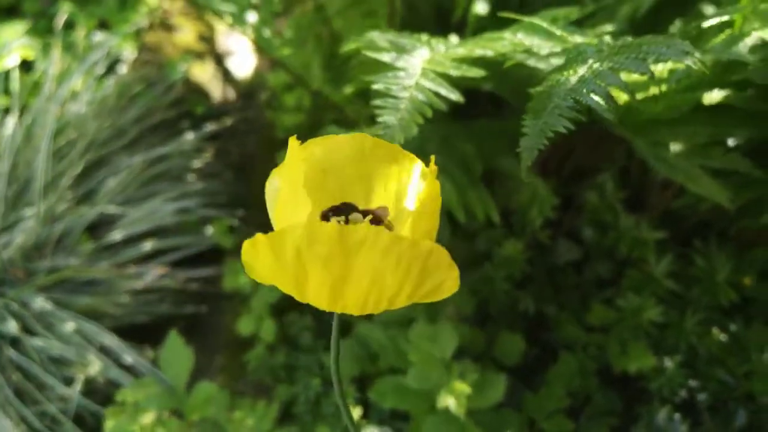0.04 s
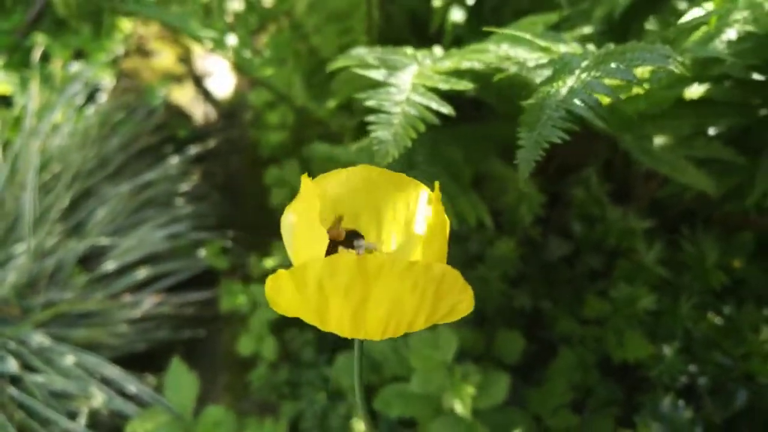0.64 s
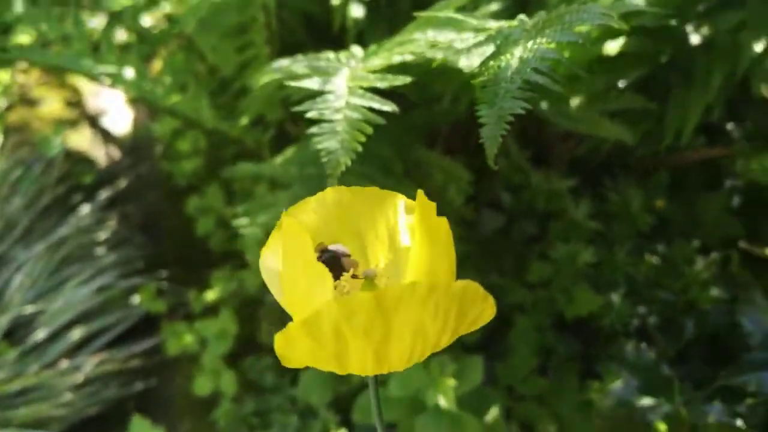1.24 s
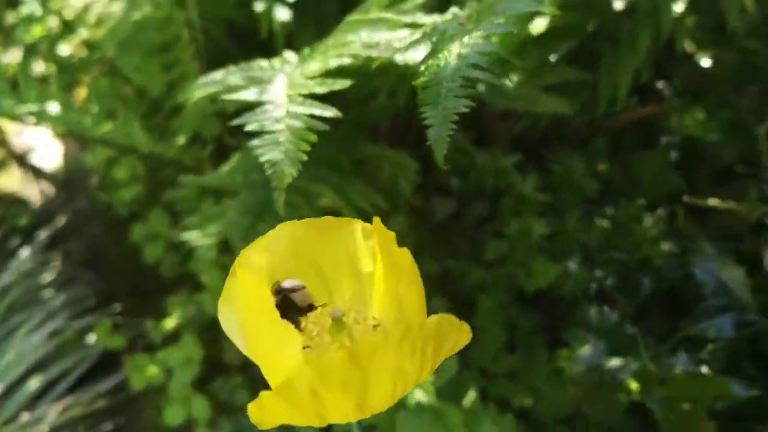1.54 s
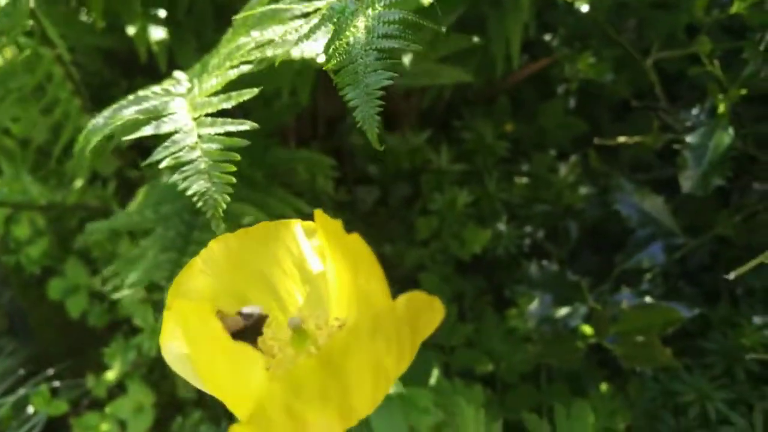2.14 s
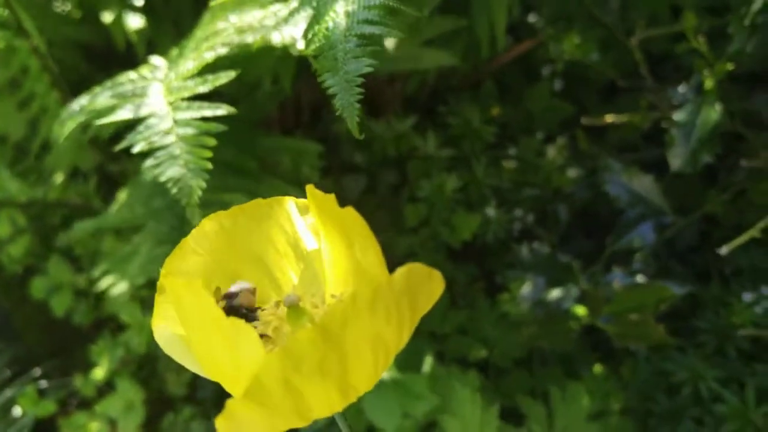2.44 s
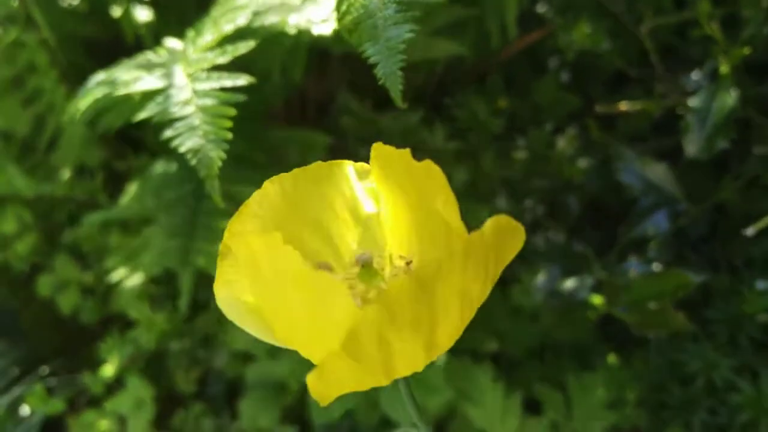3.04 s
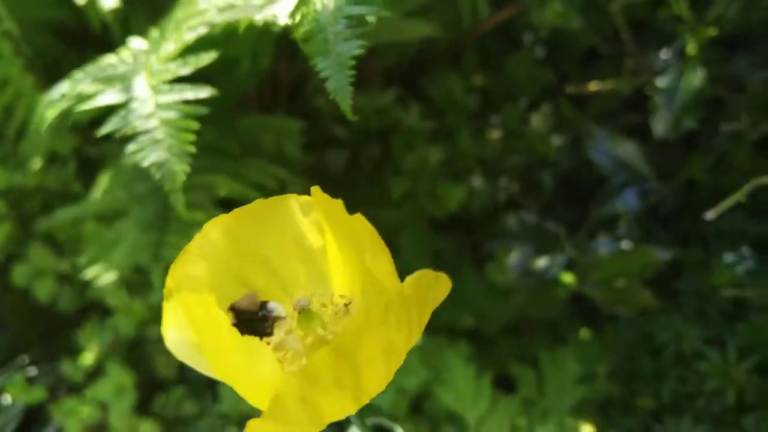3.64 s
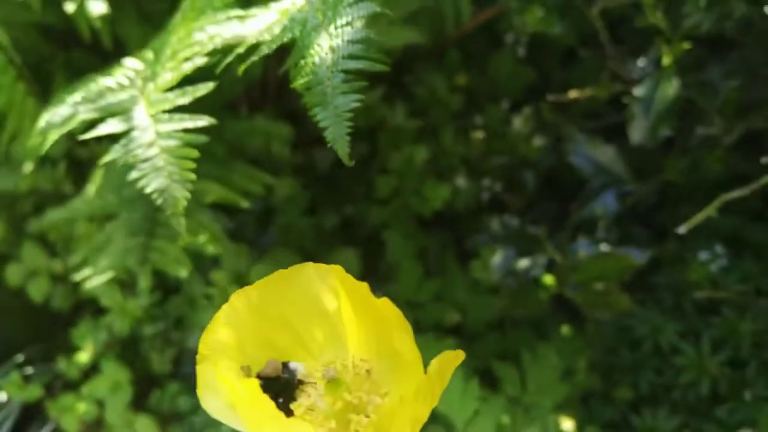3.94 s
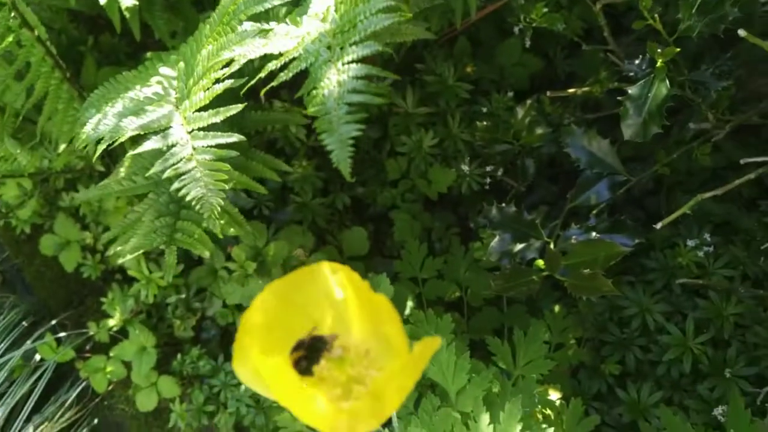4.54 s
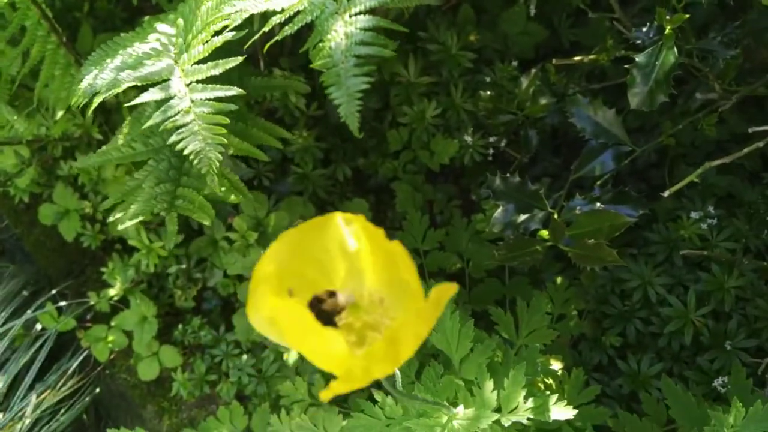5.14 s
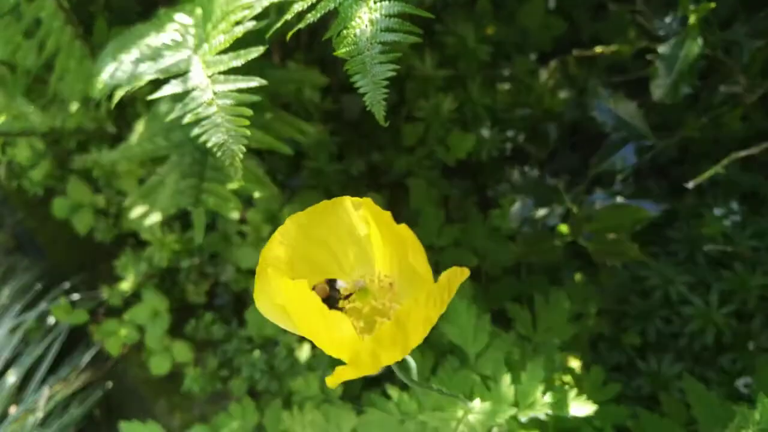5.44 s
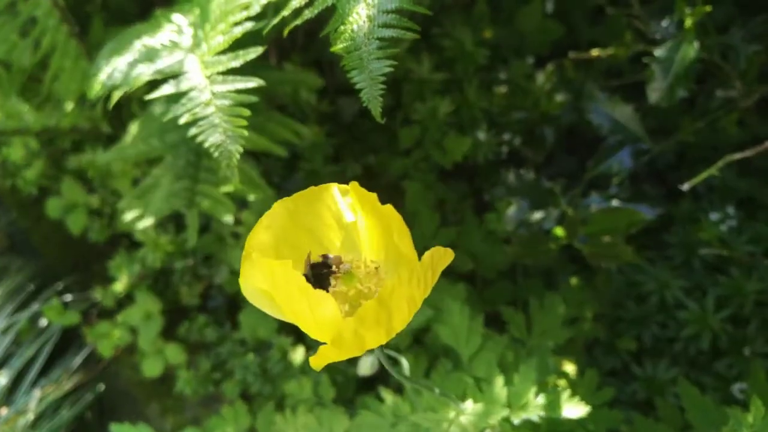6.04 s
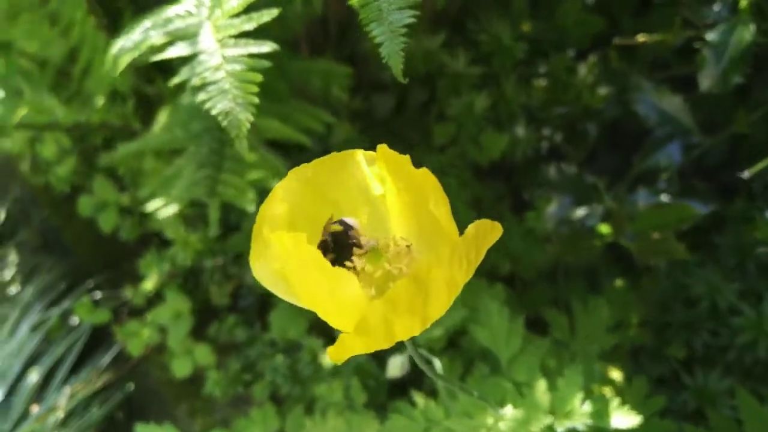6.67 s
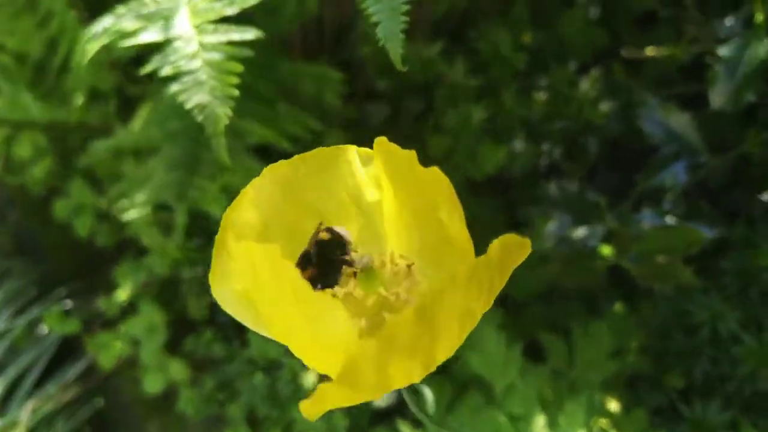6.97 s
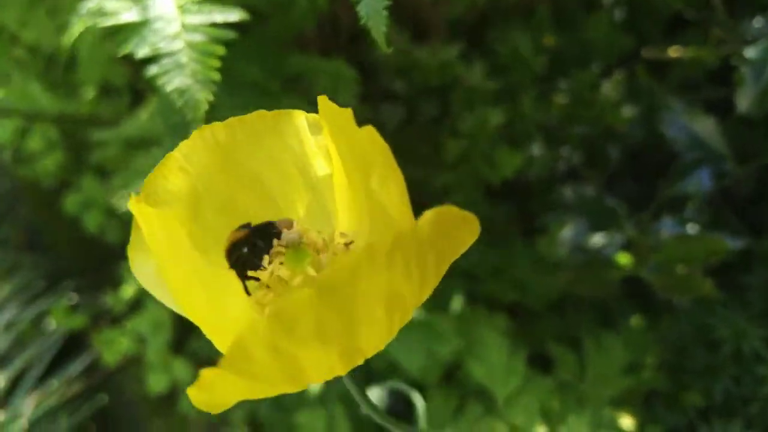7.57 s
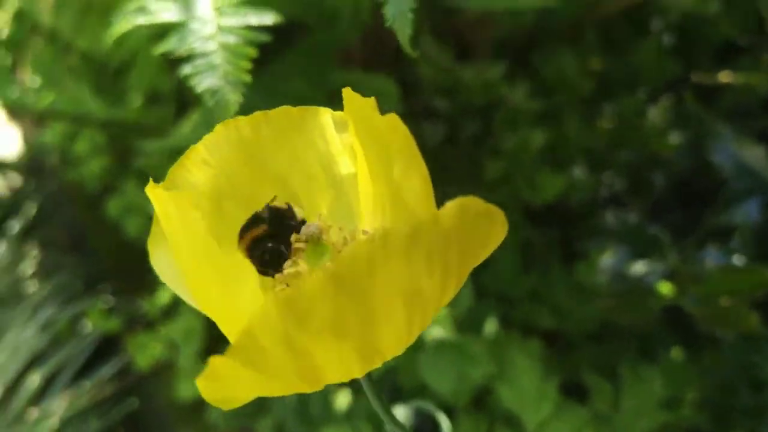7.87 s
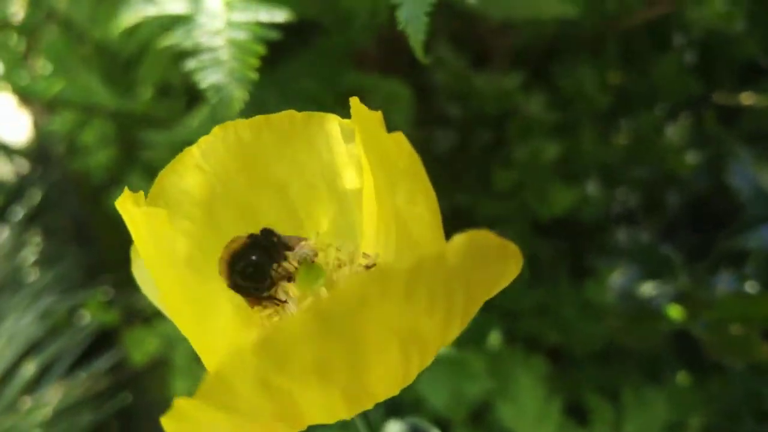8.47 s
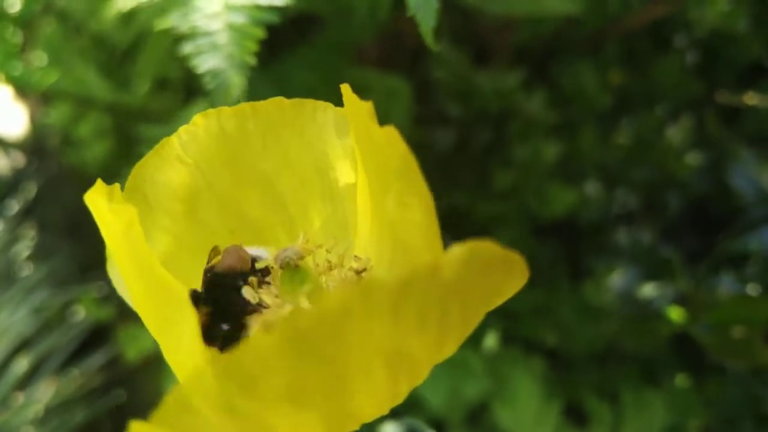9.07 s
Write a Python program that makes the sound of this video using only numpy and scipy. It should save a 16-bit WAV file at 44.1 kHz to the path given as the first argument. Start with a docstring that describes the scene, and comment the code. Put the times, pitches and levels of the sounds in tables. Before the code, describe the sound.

A bumblebee buzzes briefly inside a flower as songbirds twitter, chirp and trill around a quiet garden.

```python
"""A shady garden. A finch whistles a falling trill with a closing flourish, using both sides of its
voice box. A nearer songbird chirps, another twitters in the hedge, and thin high calls, hoarse churrs
and far-off fluting fill the gaps. Leaves and walls scatter every note, over a soft wash of air.
Close by, a bumblebee shakes pollen from a poppy in three short buzzes, its body knocking against the
flower. Its feet scratch on the petals, and now and then something dry snaps among the plants."""
import sys
import numpy as np
from scipy import signal
from scipy.fft import rfft, irfft, next_fast_len
from scipy.io import wavfile

SR = 44100
rng = np.random.default_rng(int(sys.argv[2]) if len(sys.argv) > 2 else 0)


def store_pcm(level_fs):
    """Save levels as 16-bit WAV."""
    pcm = np.round(np.clip(level_fs, -1, 1) * 32767).astype(np.int16)
    wavfile.write(sys.argv[1], SR, np.atleast_2d(pcm).T)


N = 410564
T = np.arange(N) / SR

# tone colour of the outdoor air: (frequency [Hz], relative level [dB])
AIR_COLOUR = [(15, -38), (25, -19), (495, -18), (919, -12.5), (1110, -9), (1530, -4.5), (2170, -2),
              (2490, -3), (3530, -4), (3930, -2.5), (5580, -11), (6920, -17), (7500, -14.5), (8580, -16),
              (15500, -22.5)]
# loudness of the wash of leaves and far birds: (time [s], level [dB])
WASH_LEVELS = [(0, -64), (.8, -65), (1.5, -67.5), (2.2, -71.5), (2.8, -61.5), (3.1, -70), (4, -74),
               (5, -67.5), (6.5, -72), (7.6, -73.5), (8.3, -71), (8.5, -64), (9.0, -72), (9.3, -63)]
# its tone colour: (frequency [Hz], relative level [dB])
WASH_COLOUR = [(300, -48), (900, -18.5), (1600, -6.5), (3000, 3.5), (4500, -3), (6500, -14), (15000, -24)]

# a fluting bird in far trees: (time [s], length [s], from [Hz], to [Hz], level [dB])
FLUTING_SLIDES = [(0, 0.13, 2150, 2492, -54.5), (.18, 0.243, 2204, 2230, -59.5),
                  (.49, 0.05, 1693, 1595, -62), (3.16, .056, 1970, 1933, -61.5),
                  (3.29, 0.17, 1943, 2180, -60.5), (3.80, .15, 2380, 2650, -60.5),
                  (4.78, 0.064, 2080, 2195, -60), (4.94, 0.12, 2240, 2094, -58),
                  (7.83, .037, 2190, 2257, -62), (7.95, .096, 2060, 1965, -65.5),
                  (8.1, .13, 2044, 2090, -61.5), (8.74, .028, 2125, 2040, -61),
                  (8.43, .12, 2450, 2030, -62.5), (8.75, 0.15, 2614, 2680, -59.5)]
# single whistles of other far birds: (time [s], length [s], pitch [Hz], level [dB])
FAR_WHISTLES = [(.21, 0.097, 4670, -64.5), (1.17, .05, 2090, -67), (1.2, 0.081, 4330, -61),
                (1.33, 0.041, 2160, -65.5), (1.93, 0.083, 3860, -64.5), (4.36, 0.089, 4010, -69),
                (4.53, 0.15, 4520, -66)]
# harsh falling calls: (time [s], level [dB])
CHURR_CALLS = [(.425, -52.5), (.56, -53), (.865, -55), (1.08, -59.5), (1.225, -55.5), (1.381, -60),
               (1.69, -59.5), (1.775, -57.5)]
# bursts of scratchy notes: (time [s], length [s], lowest [Hz], highest [Hz], level [dB])
SCRATCHY_BURSTS = [(2.63, 0.32, 3800, 5416, -58), (2.66, .22, 1460, 1619, -70.5),
                   (3.23, .15, 3900, 4910, -60), (9.2, .11, 3010, 4580, -58)]
# a thin call that dips in the middle: (time [s], lowest pitch [Hz], level [dB])
THIN_CALLS = [(-.1, 7370, -69), (.31, 7420, -54), (.84, 7500, -66), (1.43, 7520, -66), (1.889, 7590, -63.5),
              (2.40, 7570, -65), (3.125, 7180, -55.5), (5.555, 7280, -58), (6.66, 7250, -55),
              (7.14, 7550, -70.5)]
# the same voice sliding: (time [s], length [s], from [Hz], to [Hz], level [dB])
THIN_SLIDES = [(1.92, 0.088, 7070, 6400, -63), (4.16, 0.06, 6700, 7200, -61),
               (4.21, 0.072, 7280, 6900, -54), (4.76, 0.35, 8030, 7520, -69.5),
               (6.83, .15, 7400, 7660, -68)]
# the hedge bird's ups and downs: (time [s], length [s], from [Hz], to [Hz], level [dB])
HEDGE_SLIDES = [(2.175, 0.072, 6180, 5290, -51), (2.205, .057, 3630, 4250, -56),
                (2.325, 0.024, 3700, 5230, -51.5), (2.345, 0.062, 5440, 4920, -44.5),
                (2.79, 0.0277, 4900, 5880, -42), (2.925, 0.035, 5290, 3960, -46.5),
                (3.232, 0.031, 4920, 5730, -48), (3.262, 0.026, 5000, 4400, -48),
                (3.343, .035, 3646, 4500, -45), (6.305, .04, 6300, 6200, -59),
                (6.42, 0.059, 5650, 5150, -59.5), (8.984, .026, 3584, 4053, -44.5),
                (9.246, .031, 3870, 4640, -42)]
# its quick falling chirps: (time [s], starting pitch [Hz], level [dB])
HEDGE_CHIRPS = [(2.625, 4420, -49.5), (2.655, 4580, -50), (2.683, 6470, -50.5), (2.700, 4750, -48),
                (2.768, 6700, -53), (2.822, 4770, -47), (2.912, 6920, -52.5), (3.170, 4900, -48.5)]

# dry snaps among the plants: (time [s], level [dB])
PLANT_SNAPS = [(.643, -37.5), (.884, -40), (1.6218, -32), (2.624, -41)]
# the tones a snap rings with: (pitch [Hz], time to fade by 60 dB [s], relative level [dB])
SNAP_TONES = [(2660, .012, -25), (3160, 0.011, 3.5), (5100, 0.016, -6.5), (8350, 0.0099, -13)]
# loudness of the bee's feet on the petals: (time [s], level [dB])
FEET_LEVELS = [(0, -73), (.3, -77), (.8, -70.5), (1.25, -69), (1.5, -74), (1.95, -67.5), (2.7, -73.5),
               (3.05, -89), (4.4, -78), (9.3, -96.5)]
# their dry tone colour: (frequency [Hz], relative level [dB])
FEET_COLOUR = [(300, -40), (1400, -12.5), (3000, 4), (5500, 0.5), (9500, -6), (15500, -9)]
# the bee's buzzes: (time [s], fade-in [s], hold [s], fade-out [s], starting muscle rate [Hz],
# level [dB], rustle compared with knocks [dB])
BEE_BUZZES = [(.33, .15, .16, .27, 348, -51.5, 0), (3.31, .14, 0.52, 0.1, 322, -58.5, -4.5),
              (5.039, .06, .44, .045, 343, -56.5, -3)]
# the flower's tone changes with the bee's grip, one list a buzz: (frequency [Hz], relative level [dB])
FLOWER_COLOURS = [
    [(300, -39), (800, -25), (1400, -6.5), (3000, 1.5), (4300, -2.5), (5800, 4), (7000, -1), (9000, -7),
     (11500, -8.5), (15500, -8.5)],
    [(300, -47), (800, -20), (1350, -6.5), (3000, -1.5), (4200, 4), (4900, -2), (6700, 1), (8700, -7),
     (10200, -0.5), (12500, -14.5), (15500, -15)],
    [(300, -36), (800, -26), (1250, -10), (3000, 2.5), (4200, 5.5), (6700, -1.5), (7600, -7.5), (9000, -9),
     (10300, -3.5), (12300, -15.5), (15500, -15)],
]

# the near bird's thin held notes: (time [s], length [s], starting pitch [Hz], level [dB])
NEAR_WHISTLES = [(8.160, 0.076, 8150, -59.5), (8.187, 0.1, 7360, -56.5), (8.279, 0.042, 8480, -55),
                 (8.762, 0.188, 7690, -56.5), (9.105, 0.11, 5630, -48.5)]
# its falling notes: (time [s], length [s], from [Hz], to [Hz], level [dB])
NEAR_SLIDES = [(8.067, 0.06, 5370, 4570, -59.5), (8.313, .042, 7970, 6220, -49),
               (8.438, 0.033, 8560, 7100, -42), (8.463, .044, 7320, 6120, -48.5),
               (8.46, .02, 5160, 4850, -57), (8.556, 0.012, 5400, 4150, -33),
               (8.566, 0.024, 3935, 3452, -30.5), (8.631, 0.013, 4020, 3550, -27.5),
               (8.641, .055, 3070, 2602, -44.5), (9.107, .22, 8744, 7430, -42)]
# its tiny rising pips: (time [s], starting pitch [Hz], level [dB])
NEAR_PIPS = [(8.604, 3530, -32), (8.736, 3000, -33.5), (8.794, 3380, -32.5), (8.864, 3440, -32.5),
             (8.932, 3370, -34.5), (9.012, 3390, -33.5)]

# the finch's syllables (short song pieces), by name:
# (time into syllable [s], base pitch [Hz], relative level [dB], warble depth [Hz])
SYLLABLE_SHAPES = { "tick": [(0, 7900, -10.5, -3), (.016, 6700, -5.5, 350), (.021, 5690, -3, 350),
                   (.033, 5500, 0.5, 348), (.036, 4170, 7, 0), (.041, 2910, -7, 0), (.049, 1900, -6, 0)],
                   "zit": [(0, 8300, -14, 198), (.018, 6560, -7, 400), (.026, 5500, 1.5, 300),
                   (.034, 5340, -0.5, 300), (.039, 4600, -0.5, 0), (.044, 3200, -11, 0)],
                   "flick": [(0, 9500, -15, 0.0051), (.007, 5800, 3, 0), (.014, 3000, 3, 0)],
                   "lisp": [(0, 5660, -8.5, 0), (.008, 5130, -2, 0), (.018, 4600, 3, 0)],
                   "chew": [(0, 3380, -12, -1), (.011, 3727, -3, 0), (.02, 4370, -1, 100),
                   (.025, 3615, -.5, -1), (.031, 3215, 1.5, 101), (.039, 2900, -5.5, 99),
                   (.048, 2760, -4.5, 100)], "chip": [(0, 4510, 3.5, 0), (.005, 3884, 0.5, 0),
                   (.011, 3490, 4, 0), (.017, 3255, -3, 0), (.021, 2700, -10.5, 0),
                   (.026, 2600, -40, 0.0093)], "lift": [(0, 3180, -5.5, 1), (.012, 4224, 1.5, 201),
                   (.019, 4800, -11, 250), (.031, 5440, -9, 100)], "slur": [(0, 5330, 1, 0),
                   (.012, 4150, -1.5, 102), (.035, 3387, 1.5, 98), (.055, 3202, -2, 290),
                   (.09, 2750, -5, 435), (.113, 2110, -23, 298)], "swoop": [(0, 3020, -17, 0),
                   (.02, 2246, -10, 0), (.041, 2186, -4, 0), (.054, 2416, -6.5, 0), (.068, 3173, 3.5, 0),
                   (.078, 3834, -1.5, 0), (.082, 4400, -8, 0), (.089, 3127, 4, 0), (.104, 1800, -22, 0)],
                   "hiccup": [(0, 2940, -9, 0), (.008, 4040, 0, 0), (.014, 3900, -9, 0)],
                   "flourish": [(0, 1926, -4, 1), (.014, 3013, -2, 0), (.03, 3226, 3, -2),
                   (.045, 2837, 1.5, 150), (.063, 2584, -8.5, 550), (.085, 3097, -9, 590),
                   (.11, 4150, -3.5, 600), (.18, 4313, -3, 450), (.27, 4174, -11, 500)], }
# its song, one row for each run of a syllable: (syllable [name], time [s], repeats [count], spacing [s],
# level [dB], pitch [ratio], first one softer by [dB], first one higher by [fraction])
FINCH_SONG = [("tick", 4.5, 4, .1362, -53.5, .94, 7, 0), ("chew", 5.055, 5, .1188, -39, 1, 3.5, 0.0497),
              ("chip", 5.627, 7, .0778, -40.5, .96, 2.4, 0), ("slur", 6.201, 1, 0, -37.5, 0.97, 0, 0),
              ("swoop", 6.391, 3, .1545, -39, 0.95, 0, 0.045), ("zit", 6.862, 2, 0.087, -46.5, 0.99, 0, 0),
              ("flourish", 7.065, 1, 0, -40.5, 1, 0, 0)]
# what the other side of its voice box adds to a syllable, by name:
# (added syllable [name], delay [s], relative level [dB], relative pitch [ratio])
FINCH_SECOND_VOICE = {"chew": ("lisp", -0.015, -6, .96), "chip": ("lift", .0158, -1.9, 1.01),
                      "slur": ("flick", -.018, -17, .94), "swoop": ("flick", -.01, -17.5, 0.98),
                      "flourish": ("hiccup", -0.0092, -7, .94)}


def undb(db):
    """Turn decibels into a number to multiply by."""
    return 10 ** (np.asarray(db) / 20)


def unit(x):
    """Scale to an average strength (rms) of 1."""
    return x / np.sqrt(np.mean(x ** 2) + 1e-20)


def add(out, s, x):
    """Mix x into out, starting at s seconds."""
    i = int(round(s * SR))
    lo, hi = max(i, 0), min(i + len(x), len(out))
    if hi > lo:
        out[lo:hi] += x[lo - i:hi - i]


def wander(t, rate):
    """Drift about zero, heading for a new random value `rate` times a second."""
    return np.interp(t * rate % 1023, np.arange(1024), rng.standard_normal(1024))


def colour(x, points):
    """Shape the lows and highs of x along a tone colour, then scale to strength 1."""
    hz, db = np.transpose(points)
    size = next_fast_len(len(x))
    f = np.maximum(np.fft.rfftfreq(size, 1 / SR), 1)
    gain = undb(np.interp(np.log(f), np.log(hz), db))
    return unit(irfft(rfft(x, size) * gain, size)[:len(x)])


def garden(x, dull_hz, leaves_db, leaves_s, walls_db, walls_s):
    """Leaves dull the direct sound; echoes off leaves and walls fade by 60 dB in the times given."""
    t = np.arange(SR) / SR
    response = signal.lfilter(*signal.butter(2, dull_hz, fs=SR), signal.unit_impulse(SR))
    for db, fade_s in ((leaves_db, leaves_s), (walls_db, walls_s)):
        echoes = rng.standard_normal(SR) * (rng.random(SR) < .05)
        echoes *= np.clip((t - .002) / .0016, 0, 1) * np.exp(-np.log(1000) * t / fade_s)
        response += undb(db) * echoes / np.linalg.norm(echoes)
    total = np.sqrt(1 + undb(leaves_db) ** 2 + undb(walls_db) ** 2)
    return signal.oaconvolve(x, response / total)[:N]


def voice_box(t, hz, gain, waver, flutter_db, octave_db):
    """A bird's nearly pure whistle, unsteady in pitch and strength, with a faint tone an octave up."""
    hz = hz * (1 + waver * wander(t, 348.7))
    phase = 2 * np.pi * np.cumsum(hz) / SR
    flutter = unit(undb(flutter_db * wander(t, 120)))
    return np.sqrt(2) * gain * flutter * (np.sin(phase) + undb(octave_db) * np.sin(2 * phase))


def note(hz, db, taper, **voice):
    """One whistle along a pitch path; taper is the share of it spent fading in and out."""
    gain = undb(db) * signal.windows.tukey(len(hz), taper)
    return voice_box(np.arange(len(hz)) / SR, hz, gain, **voice)


def slides(notes, bend, **voice):
    """Notes that slide in pitch; with a bend over 1 they move fast at first, then level off."""
    out = np.zeros(N)
    for start, length, from_hz, to_hz, db in notes:
        to_go = np.linspace(1, 0, int(length * SR)) ** bend
        add(out, start, note(to_hz + (from_hz - to_hz) * to_go, db, **voice))
    return out


def improvise(bursts, per_second, note_s, glide, spread_db):
    """Fill each burst with loosely spaced notes of random pitch, slope and strength."""
    notes = []
    for start, length, low_hz, high_hz, db in bursts:
        count = max(1, round(length * per_second))
        for k, (late, pitch, slope, softness) in enumerate(rng.random((32, 4))[:count]):
            s = start + length * (k + late / 2) / count
            from_hz = low_hz + (high_hz - low_hz) * pitch
            to_hz = from_hz * (1 + glide * (2 * slope - 1))
            notes.append((s, note_s, from_hz, to_hz, db - spread_db * (2 * softness - 1)))
    return notes


def background(air_db=-66.5):
    """Steady faint air under a gently shifting wash of leaves and far birds."""
    air = undb(air_db) * colour(rng.standard_normal(N), AIR_COLOUR)
    wash_db = np.interp(T, *np.transpose(WASH_LEVELS)) + 3 * wander(T, 18)
    return air + undb(wash_db) * colour(rng.standard_normal(N), WASH_COLOUR)


def far_birds():
    """Slow, low fluting among stray whistles that hold one pitch."""
    stray = [(s, length, hz, hz, db) for s, length, hz, db in FAR_WHISTLES]
    return slides(FLUTING_SLIDES + stray, bend=1.2, waver=.017, flutter_db=2, taper=.18, octave_db=-26.5)


def harsh_birds(churr_s=.05, from_hz=3400, to_hz=2638):
    """Falling churrs and scratchy notes, made hoarse by a strong, fast waver in pitch."""
    churrs = [(s, churr_s, from_hz, to_hz, db) for s, db in CHURR_CALLS]
    scratches = improvise(SCRATCHY_BURSTS, per_second=28, note_s=.04, glide=.154, spread_db=1)
    return slides(churrs + scratches, bend=.99, waver=.16, flutter_db=2, taper=.22, octave_db=-28.5)


def thin_bird(call_s=.2, dip_hz=302):
    """A very high call, repeated with the same shallow dip in pitch, and a few slides."""
    voice = dict(waver=.016, flutter_db=7, taper=.44, octave_db=-54)
    out = slides(THIN_SLIDES, bend=1, **voice)
    u_shape = np.linspace(-1, 1, int(call_s * SR)) ** 2
    for s, hz, db in THIN_CALLS:
        add(out, s, note(hz + dip_hz * u_shape, db, **voice))
    return out


def hedge_bird(chirp_s=.02, fall_ratio=.73):
    """A fluttering twitter of slides and quick falling chirps."""
    chirps = [(s, chirp_s, hz, hz * fall_ratio, db) for s, hz, db in HEDGE_CHIRPS]
    return slides(HEDGE_SLIDES + chirps, bend=1.2, waver=.035, flutter_db=9.5, taper=.13, octave_db=-34)


def snaps(crack_s=.0052, crack_db=-12, lowest_hz=1700):
    """Each snap is a tiny crack with a short woody ring, too small to carry any bass."""
    out, t = np.zeros(N), np.arange(SR // 20) / SR
    fade = -np.log(1000) * t
    for s, db in PLANT_SNAPS:
        ring = sum(undb(tone_db) * np.sin(2 * np.pi * hz * t) * np.exp(fade / ring_s)
                   for hz, ring_s, tone_db in SNAP_TONES)
        crack = undb(crack_db) * rng.standard_normal(len(t)) * np.exp(fade / crack_s)
        add(out, s, undb(db) * (ring / 2 + crack))
    return signal.sosfilt(signal.butter(3, lowest_hz, "high", fs=SR, output="sos"), out)


def rustle(touches, fade_s):
    """Every touch sets off a puff of noise that quickly dies away."""
    strength = signal.lfilter([1], [1, -np.exp(-1 / (fade_s * SR))], touches)
    return strength * rng.standard_normal(len(touches))


def bee_feet(per_second=400, spread_db=3.3):
    """Tiny claws scratch the petals: many faint touches and now and then a sharper tick."""
    sizes = undb(spread_db * np.minimum(rng.exponential(size=N), 2.8))
    touches = sizes * (rng.random(N) < per_second / SR)
    scratches = colour(rustle(touches, fade_s=.00089), FEET_COLOUR)
    return scratches * undb(np.interp(T, *np.transpose(FEET_LEVELS)))


def bumblebee(backstroke=.29, uneven_db=2, slowing=.13, swell_db=3.5, ends_db=-15):
    """The bee's shaking body knocks the flower's pollen tips on both the out and the back stroke."""
    out = np.zeros(N)
    for (start, fade_in, hold, fade_out, start_hz, db, rustle_db), tone in zip(BEE_BUZZES, FLOWER_COLOURS):
        let_go = fade_in + hold
        end = let_go + fade_out
        t = np.arange(int(end * SR)) / SR
        level_db = db + np.interp(t, [0, fade_in, let_go, end], [ends_db, -swell_db, 0, ends_db])
        # the buzz slows as the bee tires, then speeds up as it lets go
        tired = np.interp(t, [0, let_go, end], [0, 1, 0])
        rate = start_hz * (1 - slowing * tired) * (1 + .009 * wander(t, 70))
        cycle = np.cumsum(rate) / SR
        knocks = np.zeros(len(t))
        for offset, size in ((0, .89), (.48, backstroke)):
            lag = ((cycle + offset) % 1 - .5) * SR / rate  # samples from the nearest knock
            knocks += size * np.sinc(lag) * np.exp(-(lag / 6) ** 2) * undb(uneven_db * wander(t, 600))
        rustling = rustle(np.abs(knocks), fade_s=.0017)
        for _ in range(14):  # ripples in the petals spread each knock out in time
            knocks = signal.lfilter([.5, -.5, 1], [1, -.5, .5], knocks)
        buzz = colour(unit(knocks) + undb(rustle_db) * unit(rustling), tone)
        add(out, start, buzz * undb(level_db))
    return out


def near_bird(sag=.025, pip_s=.0078, rise_ratio=1.158, shrill_hz=7000):
    """Sagging held notes, falling slides and rising pips; the highest slides are the shrillest."""
    held = [(s, length, hz, hz * (1 - sag), db) for s, length, hz, db in NEAR_WHISTLES]
    pips = [(s, pip_s, hz, hz * rise_ratio, db) for s, hz, db in NEAR_PIPS]
    high = [row for row in NEAR_SLIDES if row[2] > shrill_hz]
    low = [row for row in NEAR_SLIDES if row[2] <= shrill_hz]
    return (slides(held, bend=2.2, taper=.31, waver=.013, flutter_db=3.5, octave_db=-33)
            + slides(high, bend=1.5, taper=.26, waver=.011, flutter_db=3.5, octave_db=-24)
            + slides(low, bend=1.63, taper=.35, waver=.009, flutter_db=3, octave_db=-43)
            + slides(pips, bend=.94, taper=.59, waver=.009, flutter_db=2, octave_db=-40))


def syllable(name, db, ratio, warble_hz=165):
    """One piece of the finch's song; a fast warble in pitch turns some pieces into a buzz."""
    s, hz, shape_db, depth = np.transpose(SYLLABLE_SHAPES[name])
    t = np.arange(int(s[-1] * SR)) / SR
    gain = undb(db + np.interp(t, s, shape_db)) * signal.windows.tukey(len(t), .1)
    warble_rate = warble_hz * (1 + .0825 * wander(t, 59.4))
    warble = np.sin(2 * np.pi * np.cumsum(warble_rate) / SR)
    pitch = ratio * np.interp(t, s, hz) + np.interp(t, s, depth) * warble
    return voice_box(t, pitch, gain, waver=.01, flutter_db=.95, octave_db=-45)


def finch(settle_repeats=1.16):
    """Even runs of syllables; some start soft or high, then settle. The second voice keeps in step."""
    out = np.zeros(N)
    for name, start, repeats, spacing, db, ratio, softer_db, higher in FINCH_SONG:
        for k in range(repeats):
            s = start + k * spacing
            unsettled = np.exp(-k / settle_repeats)
            level_db = db - softer_db * unsettled
            pitch = ratio * (1 + higher * unsettled)
            add(out, s, syllable(name, level_db, pitch))
            if name in FINCH_SECOND_VOICE:
                other, delay, other_db, other_pitch = FINCH_SECOND_VOICE[name]
                add(out, s + delay, syllable(other, level_db + other_db, pitch * other_pitch))
    return out


def scene():
    """Mix the garden: the further off a bird sits, the more of its sound arrives as echoes."""
    song = garden(finch(), dull_hz=4480, leaves_db=-3.5, leaves_s=.11, walls_db=-3.5, walls_s=.43)
    near = garden(near_bird(), dull_hz=7650, leaves_db=-2.5, leaves_s=.25, walls_db=-14, walls_s=.46)
    hedge = garden(hedge_bird(), dull_hz=3600, leaves_db=-2.5, leaves_s=.29, walls_db=-6, walls_s=.3)
    thin = garden(thin_bird(), dull_hz=6900, leaves_db=-1, leaves_s=.28, walls_db=-7.5, walls_s=.35)
    far = garden(far_birds(), dull_hz=3060, leaves_db=1.5, leaves_s=.17, walls_db=.5, walls_s=1)
    harsh = garden(harsh_birds(), dull_hz=3000, leaves_db=10, leaves_s=.077, walls_db=5.5, walls_s=.72)
    flowerbed = bumblebee() + snaps() + bee_feet()
    close = garden(flowerbed, dull_hz=19000, leaves_db=-9.5, leaves_s=.054, walls_db=-30.5, walls_s=.47)
    return (background() + far + harsh + thin + hedge + close + near + song)[None]


def record(dry, top_hz=15750):
    """Cut away the very highest treble."""
    return signal.sosfilt(signal.ellip(10, .2, 70, top_hz, fs=SR, output="sos"), dry)


dry = scene()
out = record(dry)
store_pcm(out)
```